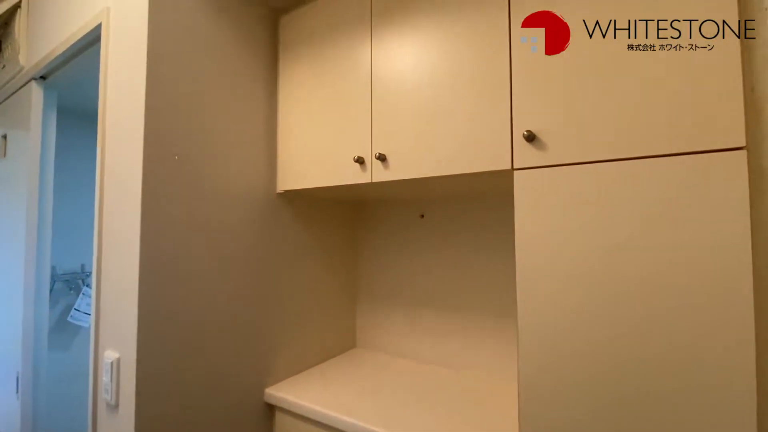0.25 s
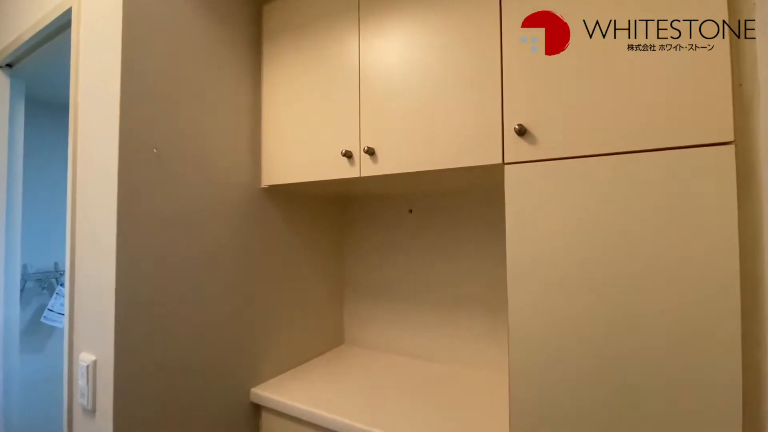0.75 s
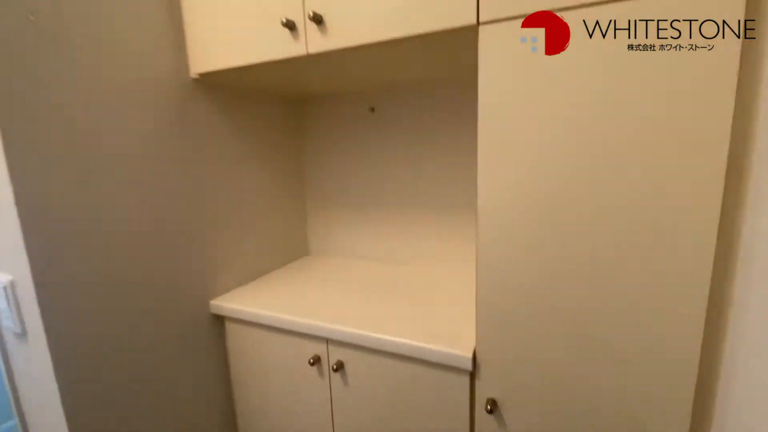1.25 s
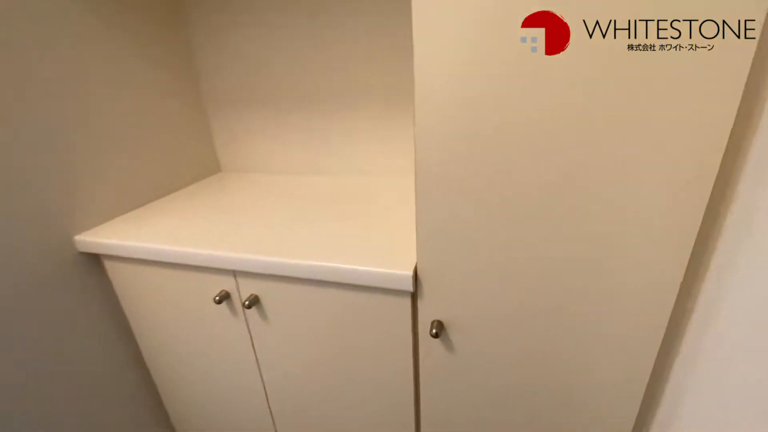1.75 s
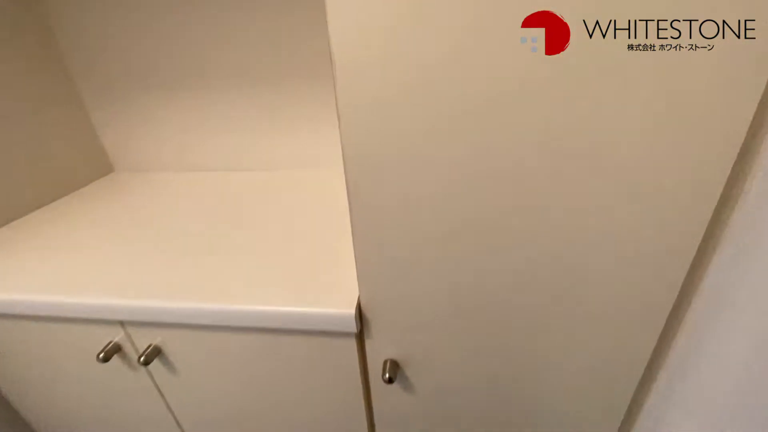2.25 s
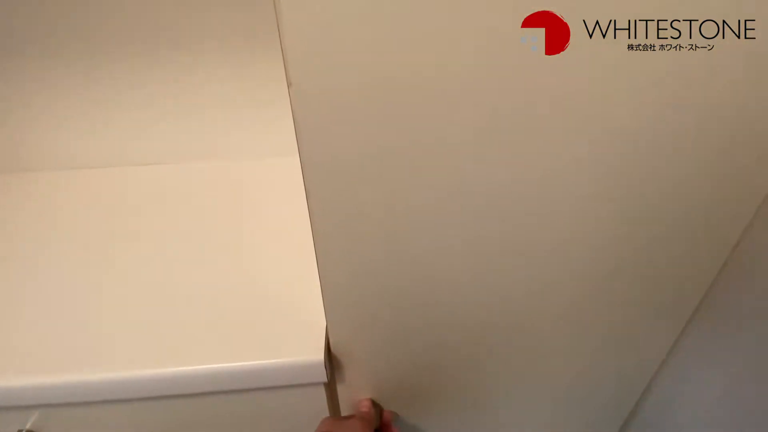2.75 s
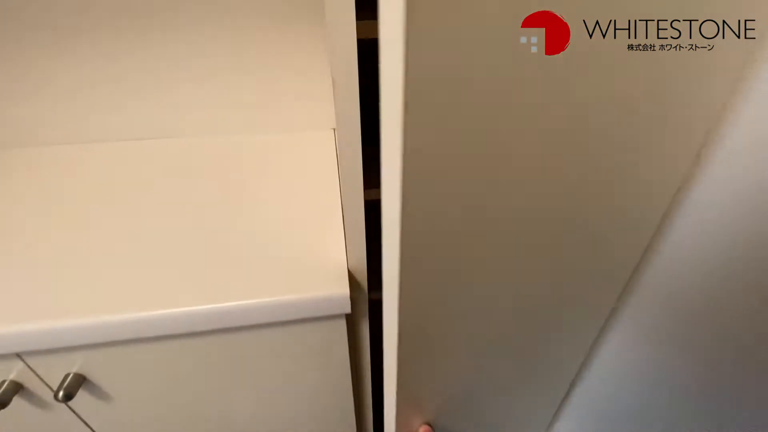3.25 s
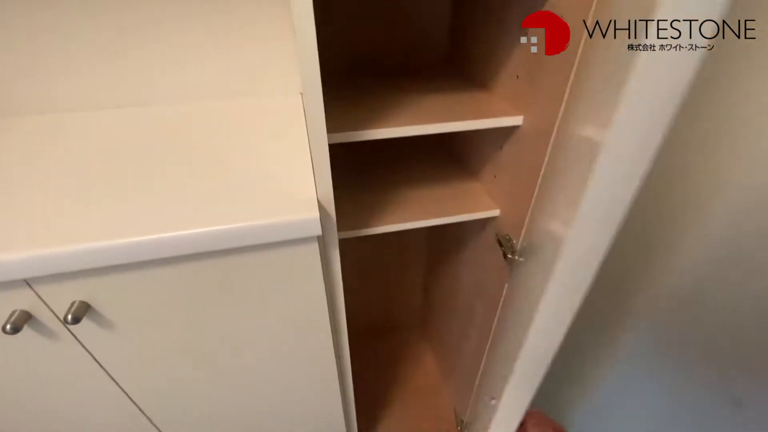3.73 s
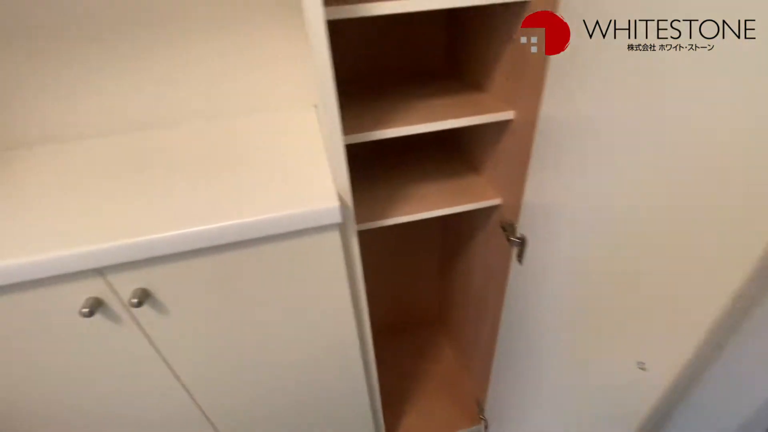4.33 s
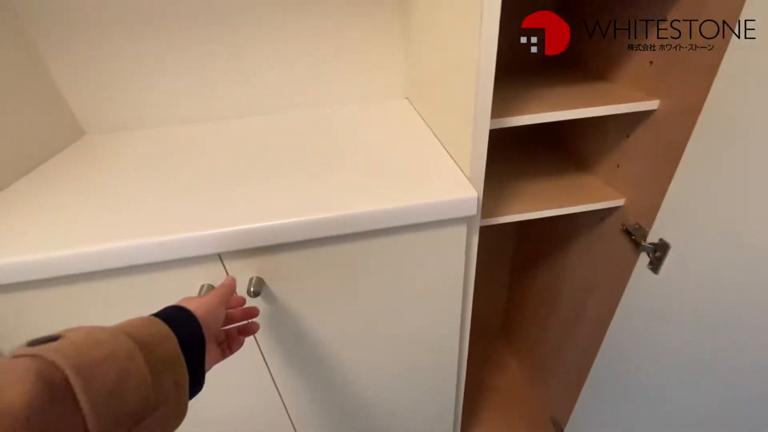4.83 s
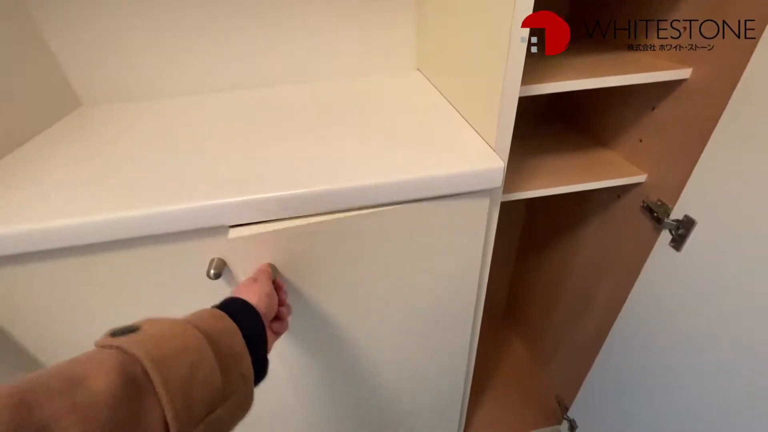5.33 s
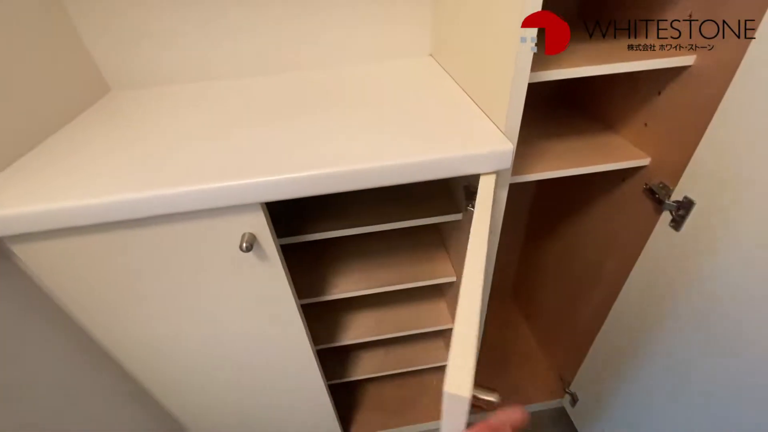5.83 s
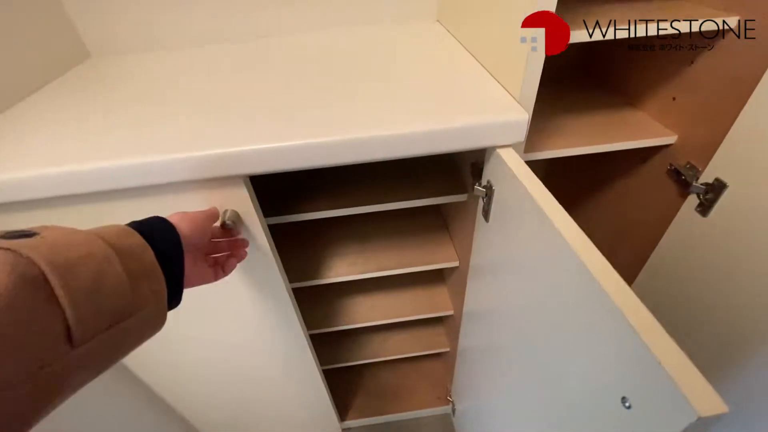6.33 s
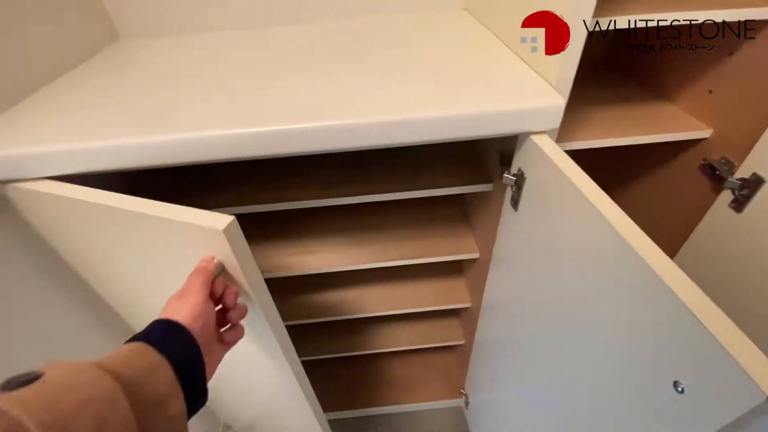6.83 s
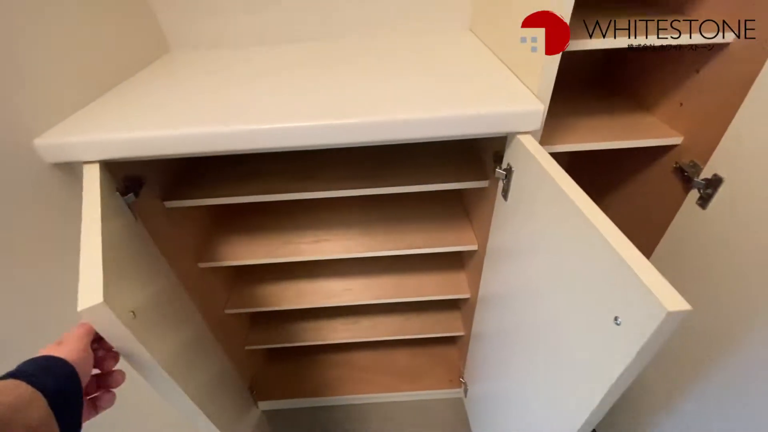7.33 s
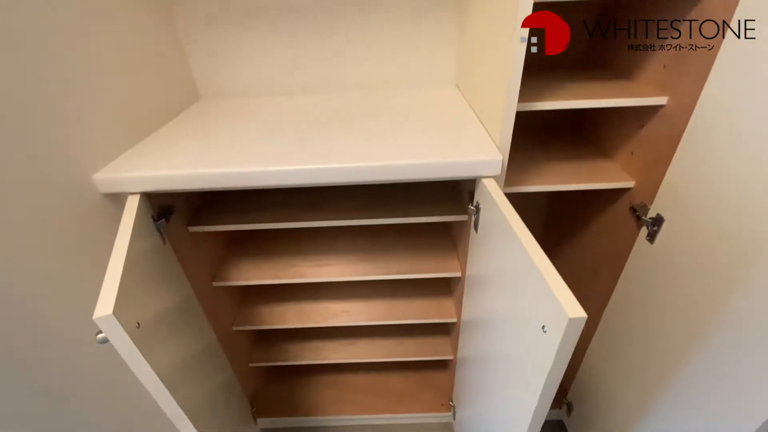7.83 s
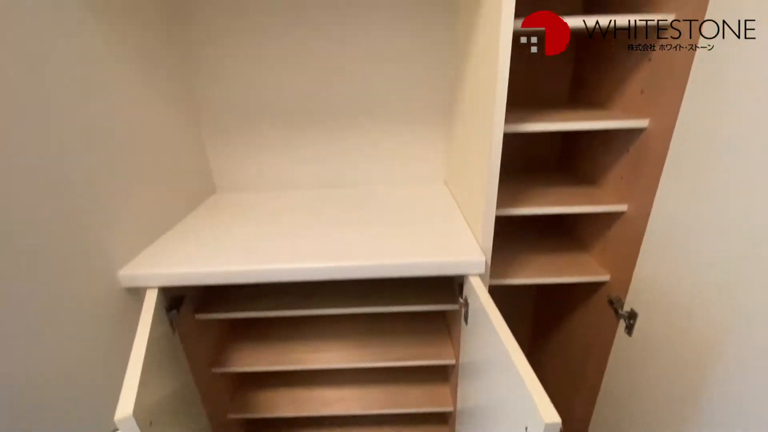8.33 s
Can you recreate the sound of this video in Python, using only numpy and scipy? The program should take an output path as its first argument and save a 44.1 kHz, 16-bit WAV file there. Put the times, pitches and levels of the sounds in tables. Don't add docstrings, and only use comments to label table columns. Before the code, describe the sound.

Close stereo sound of cupboard doors being handled in a hard-walled room. First a medium double clack, then quiet sleeve movement and soft floor shifts. Low knocks, short creaks and metallic hinge clicks lead to the loudest event, a deep wooden slam rattling for about half a second. Later come brief drags, one muffled bang and tiny taps over faint room rumble and soft hiss.

```python
import sys
import numpy as np
from scipy import signal
from scipy.fft import rfft, irfft, next_fast_len
from scipy.io import wavfile
from scipy.ndimage import uniform_filter1d

SR = 44100
rng = np.random.default_rng(int(sys.argv[2]) if len(sys.argv) > 2 else 0)


def persist_wave(psi):
    counts = np.round(np.clip(psi, -1, 1) * 32767).astype(np.int16)
    wavfile.write(sys.argv[1], SR, np.atleast_2d(counts).T)


def volts_from_db(level):
    exponent = np.asarray(level, float) / 20
    return 10 ** exponent


N = 378378

# hz, level_db
HUM = [(12, -67), (20, -16), (53, 3), (78, 2.5), (97, -12), (180, -13.5), (230, -18), (400, -120)]
HUM_DB = -53.5
# start_s, length_s, level_db
STEPS = [
    (0.727, 0.49, -54.5),
    (1.65, 0.73, -66),
    (5.843, 0.18, -75),
    (7.746, 0.22, -69),
]
STEP_ATTACK_S, STEP_DYING_DB_S = 0.11, 84
# time_s, level_db
TRAFFIC = [(0, -58.5), (.9, -58), (1.3, -61), (2.1, -58.5), (3.2, -59), (4, -59), (4.5, -63), (5.4, -62),
           (6.0, -64), (6.7, -62), (7.1, -62.5), (7.8, -60), (8.3, -61), (8.58, -62)]
TRAFFIC_BOOM_DB = -58
# hz, level_db
AIR = [(240, -13), (400, 2), (673, -2), (1020, -1.5), (1230, -5), (3020, -21.5), (5200, -31), (8800, -120)]
# hz, level_db
HISS = [(1180, -38), (2000, 0), (5540, -16), (7310, -8), (11900, -52), (13000, -23), (14400, -16),
        (16000, -12)]
HISS_DB = -75.5
# start_s, length_s, level_db, crispness_db
RUBS = [(0, 0.48, -80, 1.5), (0.994, 0.13, -70, -1), (1.22, 0.15, -77.5, 3), (1.603, 0.068, -69.5, 10),
        (1.727, 0.46, -74, -3), (1.838, 0.11, -76, 7.5), (1.985, 0.063, -65, -1.5),
        (2.183, 0.25, -58, -7.5), (2.317, 0.14, -64, -27), (2.432, 0.38, -62, -1), (2.842, 0.51, -63.5, -3),
        (3.36, 0.1, -73.5, -2), (3.481, 0.76, -62.5, -2), (3.8, 0.32, -66.5, -2), (4.238, 0.85, -67, -2),
        (4.34, 0.019, -67, 11), (4.917, 0.8, -69, -1), (5.734, 0.42, -76, 1.5), (6.15, 0.79, -72.5, -1.5),
        (6.913, 0.16, -79.5, 5), (7.117, 0.46, -70.5, -5), (7.57, 0.64, -67, -4.5), (7.73, 0.024, -69, 14),
        (8.017, 0.076, -68.5, -3), (8.22, 0.47, -73, -4.5)]
RUB_ATTACK_S, RUB_DYING_DB_S, RUB_BODY_DB = 0.061, 215, 3.5
# hz, level_db
CLOTH = [(1060, 4.5), (1800, 3.5), (4590, -1.5), (5680, -4.5), (7330, 1), (8000, -14), (10400, -54),
         (17600, -120)]
# hz, level_db
CRISP = [(4710, -6.5), (8000, -6), (11900, -13.5), (12500, -13), (13200, -36), (14400, -12.5), (15100, -17),
         (16000, -12)]
# hz, level_against_sum_db
SIDE_FAR = [(60, -11), (200, -6), (380, -2.5), (700, 3), (1290, 2), (2380, 0.5), (8120, -1.5), (15000, 0.5)]
# hz, level_against_sum_db
SIDE_NEAR = [(60, -9), (200, -10), (380, -2.5), (700, 2), (1290, -1), (2380, 0), (4400, -2), (15000, -2.5)]
# hz, t60_s
ROOM_T60 = [(60, 0.95), (300, 0.31), (1500, 0.24), (5000, 0.19), (14000, 0.12)]
ROOM_BANDS_HZ = 25 * 2 ** np.arange(0, 9.6, .5)
# hz, level_db
SCATTER_BASS = [(40, -14), (400, 0)]
SCATTER_T60_S = 0.14
# hz, level_db
TREBLE_SHAPE = [(12300, 0), (12750, -24), (13550, -24), (13800, 0), (15200, -1), (15900, -16), (16500, -40)]
# start_s, peak_db, pitch_hz, length_s
CREAKS = [(2.975, -46, 694, 0.014), (3.037, -44, 716, 0.0093), (3.053, -46, 745, 0.036),
          (3.105, -42.5, 680, 0.0099), (3.169, -40, 700, 0.006), (3.188, -41, 700, 0.009),
          (3.264, -38, 715, 0.01), (3.323, -36.5, 694, 0.012), (3.617, -46, 1450, 0.028),
          (3.617, -44.5, 727, 0.008), (5.708, -56, 1450, 0.022)]
SQUEAK_FALL_PER_S, SQUEAK_FALL_MAX = 16.3, 0.257
SLIP_JITTER = (.5, 1.6)
# start_s, peak_db, pitch_hz, t60_s
KNOCKS = [
    (1.554, -49.5, 1000, 0.053),
    (2.739, -32, 413, 0.036),
    (2.747, -30, 480, 0.022),
    (2.756, -28, 356, 0.028),
    (2.765, -29, 345, 0.027),
    (2.788, -36, 305, 0.046),
    (2.968, -43, 523, 0.069),
]
# start_s, peak_db,
# pitch_hz, t60_s
DRUMS = [(.395, -28, 196, .12), (0.459, -29.5, 148, 0.14), (.52, -42, 160, 0.12), (0.607, -33, 133, 0.17),
         (4.573, -13, 132.7, 0.22), (4.606, -13.5, 133, 0.15), (4.671, -26, 146, 0.1),
         (4.718, -24, 146, .2), (4.845, -23, 131, 0.44), (4.867, -20.5, 129, 0.19), (4.958, -13, 136, 0.09),
         (4.553, -29, 2550, .07), (4.552, -28, 2000, .08), (2.875, -45, 270, .2), (4.835, -32.5, 2075, .12),
         (4.814, -37, 2180, 0.073), (.433, -34, 780, 0.22), (.392, -29, 440, .15), (.387, -39, 2250, .08),
         (.51, -45, 2300, 0.052), (0.56, -44, 1860, .06), (.515, -36, 420, .12), (6.553, -55, 1480, .1),
         (6.555, -59, 1700, .08), (6.345, -42, 1090, .06), (2.745, -40, 620, .07),
         (2.763, -40.5, 592, 0.092), (2.6, -37, 197, 0.091), (6.278, -37.5, 124, .15),
         (6.337, -21, 135, .15), (6.381, -22, 111.4, 0.28), (6.549, -34, 235.3, 0.43),
         (6.601, -27.5, 116.4, 0.19), (6.853, -35, 127, 0.11), (6.895, -39, 122, 0.16),
         (6.913, -32.5, 119.3, 0.23), (7.179, -47, 115, 0.12), (2.755, -42, 225, 0.14),
         (2.965, -44, 1650, .025), (3.17, -42, 110, .15), (3.323, -46, 260, .1), (3.01, -40, 100, .1),
         (.617, -48, 1740, .1), (.575, -46, 1150, .05), (.39, -40, 1280, .1), (3.68, -45, 98, 0.22),
         (3.781, -47, 178, .1), (3.3, -41.5, 100, 0.23), (3.359, -40, 255, 0.12), (3.065, -43, 330, .08),
         (3.111, -46, 295, .08), (5.78, -60, 546, 0.69), (0.387, -38, 1733, 0.18),
         (0.399, -44, 2800, 0.087)]
# start_s, peak_db, pitch_hz
SNAPS = [
    (3.038, -39, 710),
    (3.097, -29.5, 1010),
    (3.36, -35.5, 534),
    (3.795, -34.5, 776),
    (3.616, -47, 1700),
    (4.14, -35, 1400),
    (8.149, -44.5, 2100),
]
# start_s, peak_db, pitch_hz
TICKS = [(2.738, -51, 4800), (2.739, -53, 5600), (2.744, -52, 3750), (2.747, -55, 3900),
         (3.147, -47.5, 11450), (3.3676, -47, 11350), (4.1403, -52, 10600), (4.1405, -48, 13900),
         (4.164, -55, 11700), (6.663, -61, 5330), (7.1234, -62, 4000), (8.548, -56.5, 6950),
         (5.191, -55.5, 5790)]
# start_s, length_s, level_db, panel_note_db
DRAGS = [
    (2.733, 0.08, -44, -2),
    (2.962, 0.14, -39, -12),
    (3.152, 0.048, -45, -10),
    (3.63, 0.07, -46, -14),
    (5.246, 0.11, -46, 0.5),
    (5.366, 0.092, -42, -13),
    (7.126, 0.05, -44, -14),
]
DRAG_ATTACK_S, DRAG_DYING_DB_S = 0.026, 250
# start_s, peak_db, crack_db
BANGS = [(0.386, -18, -32), (0.508, -31, -37), (4.55, -1, -52), (4.562, -25, -26), (4.579, -24, -38),
         (4.6, -30, -25), (4.622, -35, -29.5), (4.643, -36, -30.5), (4.681, -13, -32.5), (4.786, -17, -46),
         (4.809, -10, -30.5), (4.835, -15, -47), (4.902, -19, -53), (4.95, -34, -39.5), (6.275, -52, -73),
         (6.298, -52, -43.5), (6.32, -16, -33.5), (6.331, -21, -52), (6.55, -30, -69), (6.833, -43, -63),
         (6.882, -42, -57.5)]
# start_s, length_s, level_db, brightness_db, sag_db_per_s
SHAKES = [
    [(0.384, 0.1, -26.5, -12.5, 60), (0.509, 0.26, -30, -14.5, 57.5)],
    [(4.542, 0.19, -12.5, -18, 40), (4.77, 0.018, -27, -24, 10), (4.785, 0.099, -25, -14.5, 35),
     (4.9, 0.054, -25, -19.5, 24)],
    [(6.262, 0.068, -56, -2.5, -55), (6.318, 0.22, -23.5, -22.5, 79), (6.548, 0.047, -39, -34, 45)],
    [(6.828, 0.028, -40, -24, 10), (6.88, 0.088, -40.5, -44, 15)],
]
# level_db, brightness_share, sag_share, dying_db_per_s, attack_s
BOOM = (0.07, 0.013, 1.04, 139, .012)
CLACK = (.1, .6, 1.38, 300, .005)
SIZZLE = (.1, 1.007, 1.92, 470, 0.0026)
# hz, width_hz, level_db
PANELS = [
    [(51.3, 16, -3), (164, 27, 2), (428, 60, -9)],
    [(47.2, 3.6, 3.5), (130.8, 26, 3), (175.8, 6.5, -0.5), (214, 6.7, 0), (266, 10.4, 1), (310, 22.6, -3.5)],
    [(82, 29, -14), (117.6, 12.7, 0), (139, 33, -4.5), (196, 29, -1.5), (226, 18.5, -4)],
    [(108, 17.6, -0.5), (230, 51, -10)],
]
# hz, level_db
WOOD = [
    [(18, -38), (30, -3), (59, 2), (102, -18), (146, 3.5), (400, -15.5), (520, -59), (880, -120)],
    [(18, -37), (30, -28), (124, 1), (198, -5.5), (262, -4), (400, -14), (520, -84), (880, -120)],
    [(18, -47), (30, -15), (108, 22), (166, 3), (233, -3), (400, -17), (520, -53), (880, -120)],
    [(18, -46), (30, -8), (118, 0), (235, -22), (280, -35), (400, -30), (520, -53), (880, -120)],
]
# hz, width_hz, level_db
FITTINGS = [
    [(480, 89, 2.5), (561, 12, 14.5), (800, 70, 1.5), (1760, 180, -8.5), (2270, 110, -6.5),
     (3190, 260, -12), (3610, 200, -18), (4500, 200, -22), (5140, 210, -38)],
    [(483, 22, -6), (520, 19, -3.5), (562, 21, -2.5), (745, 95, -15), (1070, 28, -5.5), (1298, 33, -8),
     (1910, 30, -24), (2160, 310, -22), (2590, 46, -18), (3910, 100, -21.5)],
    [(345, 58, 4), (450, 73, 2.5), (1110, 35, -35), (1700, 87, -14), (2830, 78, -19)],
    [(470, 94, -8), (1000, 50, -5), (1930, 200, -29)],
]
# hz, level_db
EDGE = [(210, 8), (350, 9), (418, -1), (871, -2), (1050, -5.5), (1260, -3), (1800, -32), (2340, -85)]
# hz, level_db
CRACK = [
    [(940, -12), (1600, 3), (2670, -11), (3020, -4), (4750, 2), (5760, -6), (6850, -6), (16000, -45)],
    [(940, -0.5), (1600, 0), (3390, -10.5), (6990, -7), (9510, -20), (11200, -14.5), (13900, -32),
     (16000, -55)],
    [(940, -6.5), (1600, -3.5), (4190, -4.5), (5870, -12), (7050, -8.5), (13200, -24), (16000, -21)],
    [(940, -31), (1600, 6), (6470, -7), (11900, -37), (12900, -37), (16000, -24)],
]
# hz, width_hz, level_db
STEEL = [
    [(3060, 60, -1), (3900, 53, -3), (4450, 59, -3), (4680, 54, -5), (5200, 64, -7), (7050, 70, -4)],
    [(1554, 60, -2), (1880, 40, -2), (2190, 47, -4), (3220, 40, 5), (3880, 49, -2), (4470, 40, 3.5),
     (4830, 39, -3), (6930, 40, 1), (7080, 60, 0)],
    [(1220, 60, 1), (1610, 60, -2), (2510, 50, -5)],
    [(1000, 60, 3)],
]
# start_s, peak_db, pitch_hz
RAPS = [(.388, -21, 500), (0.397, -30, 368), (.421, -31, 720), (.450, -20, 774), (.449, -28, 308),
        (.466, -27, 750), (.512, -39, 685), (0.521, -34, 350), (.535, -34, 720), (.547, -33, 657),
        (.571, -29, 720), (.614, -36, 295), (.635, -32, 620), (4.553, -12, 603), (4.548, -23, 310),
        (4.562, -22, 730), (4.582, -23, 700), (4.559, -4.5, 289), (4.576, -14, 296), (4.578, -23, 1070),
        (4.591, -12, 266), (4.617, -10.5, 278), (4.621, -28, 726), (4.64, -19, 272), (4.678, -16, 226),
        (4.691, -19.5, 255), (4.699, -27, 1080), (4.723, -19, 241), (4.752, -31, 276), (4.786, -26, 540),
        (4.593, -22, 1290), (4.958, -32, 1240), (4.643, -30, 1800), (4.777, -32, 1306), (4.803, -25, 302),
        (4.809, -34, 1085), (4.828, -28, 1080), (4.831, -24, 266), (4.85, -16, 301), (4.909, -24, 322),
        (4.929, -28, 726), (4.962, -25, 271), (6.321, -22.5, 385), (6.336, -36, 270), (6.369, -22.5, 292),
        (6.38, -33, 630), (6.402, -27, 266), (6.445, -45, 266), (6.552, -34.5, 417), (6.832, -41, 396),
        (6.866, -43, 244), (7.14, -43, 252), (7.17, -48, 252)]
RAP_CYCLES = 16.0
# start_s, peak_db
CLICKS = [(0.3849, -30.5), (0.5093, -42), (0.604, -57), (4.5525, -25.5), (4.575, -23), (4.62, -21.5),
          (4.642, -28), (4.7, -42), (4.712, -38), (4.7867, -48), (4.8094, -32), (4.835, -35), (4.9015, -49),
          (4.95, -47), (6.299, -50), (6.325, -46), (4.928, -49)]
CLICK_T60_S = 0.0086
# hz, level_db
CLICK = [(700, -24), (1500, 4), (5000, -8.5), (9500, 0.5), (12000, -3), (16000, -9)]


def rms_one(x):
    return x / np.sqrt(np.mean(x ** 2) + 1e-20)


def at_hz(points, hz):
    f, value = np.transpose(points)
    return np.interp(np.log(np.maximum(hz, 1)), np.log(np.maximum(f, 1)), value)


def gains(points, size):
    return volts_from_db(at_hz(points, np.fft.rfftfreq(size, 1 / SR)))


def colour(x, points):
    size = next_fast_len(x.shape[-1])
    return irfft(rfft(x, size) * gains(points, size), size)[..., :x.shape[-1]]


def drift(rate):
    r = np.exp(-80 * np.pi * rate / SR)
    luck = rng.standard_normal(N // 40 + 2002)
    slow = signal.lfilter([1], [1, -2 * r, r * r], luck)[2000:]
    return np.interp(np.arange(N) / 40, np.arange(len(slow)), rms_one(slow))


def grains(per_s, spread_db):
    rank = np.minimum(rng.exponential(1, N), 3.0)
    sizes = volts_from_db(spread_db * rank) * rng.choice([-1, 1], N)
    return rms_one(sizes * (rng.random(N) < per_s / SR))


def resonate(x, hz, width_hz):
    r = np.exp(-np.pi * width_hz / SR)
    top = np.array([1, 0, -1]) * (1 - r * r) / 2
    return signal.lfilter(top, [1, -2 * r * np.cos(2 * np.pi * hz / SR), r * r], x)


def ringing(x, modes):
    steps = np.arange(len(x)) / (0.0313 * SR)
    out = 0
    for k, (hz, width_hz, db) in enumerate(modes):
        luck = rng.standard_normal(int(len(x) / 500))
        wander_db = 1.0 * np.interp(steps, np.arange(len(luck)), luck)
        out = out + resonate(x * volts_from_db(db + wander_db), hz, width_hz) * (-1) ** k
    return out


def add(track, s, sound):
    at = round(s * SR)
    track[at:at + len(sound)] += sound[:N - at]


def ping(hz, t60, db):
    t = np.arange(SR // 4) / SR
    decay = volts_from_db(db - 60 * t / max(t60, .002))
    return decay * np.sin(2 * np.pi * hz * t) * np.minimum(1.52 * hz * t, 1)


def stroke(s, length, db, attack, sag_db, dying_db):
    out, t = np.zeros(N), np.arange(round((length + 1) * SR)) / SR
    held = np.minimum(t, length)
    add(out, max(s, 0), np.minimum(t / attack, 1) * volts_from_db(db - sag_db * held - dying_db * (t - held)))
    return out


def far_noise(spectrum, level_db, patchy_db, rate):
    size = next_fast_len(N)
    real, imaginary = rng.standard_normal((2, 2, size // 2 + 1))
    shape = gains(spectrum, size) * (real + 1j * imaginary)
    shape[1] *= gains(SIDE_FAR, size)
    mid, side = irfft(shape, size)[:, :N]
    scale = volts_from_db(level_db + patchy_db * drift(rate)) / np.std(mid)
    return np.array([mid + side, mid - side]) * scale


def hum_and_steps():
    level = volts_from_db(HUM_DB)
    for s, length, db in STEPS:
        level = level + stroke(s, length, db, STEP_ATTACK_S, 0, STEP_DYING_DB_S)
    return level * far_noise(HUM, 0, patchy_db=-0.5, rate=8.5)


def traffic_boom(traffic_db):
    spectrum = [(90, 3), (140, 4.5), (280, 7.5), (450, -3.5), (700, -44.5)]   # hz, level_db
    level_db = TRAFFIC_BOOM_DB + traffic_db - traffic_db.mean()
    return far_noise(spectrum, level_db, patchy_db=1.2, rate=9.4)


def air_and_sleeve(traffic_db):
    rustle = fizz = 0
    for s, length, db, crisp_db in RUBS:
        rub = stroke(s - RUB_ATTACK_S / 2, length, db, RUB_ATTACK_S, 0, RUB_DYING_DB_S)
        rustle, fizz = rustle + rub, fizz + rub * volts_from_db(crisp_db)
    rub_body = volts_from_db(RUB_BODY_DB) * (rustle - fizz).clip(0)
    air = np.hypot(volts_from_db(traffic_db), rub_body) * far_noise(AIR, 0, patchy_db=1.38, rate=11.6)
    cloth = rustle * far_noise(CLOTH, 0, patchy_db=2.0, rate=88.0)
    crisp = fizz * far_noise(CRISP, 0, patchy_db=-1.0, rate=130.0)
    return air + cloth + crisp


def background():
    traffic_db = np.interp(np.arange(N) / SR, *np.transpose(TRAFFIC))
    hiss = far_noise(HISS, HISS_DB - 4.5, patchy_db=3.5, rate=2.5)
    return hum_and_steps() + traffic_boom(traffic_db) + air_and_sleeve(traffic_db) + hiss


def room(x):
    t, tail = np.arange(SR // 2) / SR, 0
    white = rng.standard_normal((2, SR // 2))
    for low, high in zip(ROOM_BANDS_HZ, ROOM_BANDS_HZ[1:]):
        band = signal.sosfilt(signal.butter(2, [low, high], "band", fs=SR, output="sos"), white)
        decay = volts_from_db(-60 * t / at_hz(ROOM_T60, low)) * np.minimum(t / 0.0019, 1)
        tail = tail + band * decay * min(low / 350, 1)
    tail = tail / np.sqrt(np.sum(tail[0] ** 2))
    side = volts_from_db(2.5) * colour(tail[1], SIDE_NEAR)
    return signal.oaconvolve(x[None], np.array([tail[0] + side, tail[0] - side]), axes=1)[:, :N]


def ports(x, side_db, scatter_db):
    size = next_fast_len(N)
    t = np.arange(SR // 10) / SR
    scatter = rng.standard_normal(len(t)) * volts_from_db(-60 * t / SCATTER_T60_S)
    scatter = scatter / np.sqrt(np.sum(scatter ** 2))
    scattered = volts_from_db(scatter_db) * rfft(scatter, size) * gains(SCATTER_BASS, size)
    mixed = volts_from_db(side_db) * 1j + scattered
    side = irfft(mixed * rfft(x, size) * gains(SIDE_NEAR, size), size)[:N]
    return np.array([x + side, x - side])


def creaks():
    out = np.zeros(N)
    t = np.arange(3000) / SR
    for s, db, hz, length in CREAKS:
        squeak = hz > 1000
        luck = rng.standard_normal(len(t))
        grip = np.minimum(t / 0.0014, 1) * np.clip((length + 0.006 - t) / 0.008, 0, 1)
        grip = grip * (1 + 0.21 * np.sqrt(40) * uniform_filter1d(luck[::-1], size=40))
        fall = squeak * np.minimum(SQUEAK_FALL_PER_S * t, SQUEAK_FALL_MAX)
        jitter = SLIP_JITTER[int(squeak)] * uniform_filter1d(luck, size=150)
        phase = 2 * np.pi * np.cumsum(hz * (1 - fall + jitter)) / SR
        overtone = 0.4 * (hz < 1000) * np.sin(1.72 * phase)
        add(out, s, volts_from_db(db - 2.5) * grip * (np.sin(phase) + overtone))
    return out


def knocks_and_ticks():
    out = np.zeros(N)
    for s, db, hz, t60 in KNOCKS:
        add(out, s, ping(hz, t60, db - 0.5) + ping(1.606 * hz, 1.2 * t60, db - 8.0))
        add(out, s, ping(3.3 * hz, 0.41 * t60, db - 35) + ping(0.55 * hz, 1.6 * t60, db - 6.0))
    for s, db, hz, t60 in DRUMS:
        add(out, s, ping(hz, t60, db))
    for s, db, hz in SNAPS:
        add(out, s, ping(hz, 12.5 / hz, db + 1.0) + ping(1.42 * hz, 4.8 / hz, db - 2.0))
        add(out, s, ping(0.77 * hz, 5.3 / hz, db + 8.5))
    for s, db, hz in TICKS:
        add(out, s, ping(hz, 0.013, db) + ping(1.09 * hz, 0.0034, db + 0.5) + ping(0.96 * hz, 0.0063, db))
    return out


def dragging_edges():
    out, lumps = 0, grains(250, spread_db=3.0)
    low = rms_one(resonate(resonate(lumps, 55, 74), 55, 104))
    panel = rms_one(resonate(resonate(lumps, 219.5, 8.9), 237, 39))
    for s, length, db, panel_db in DRAGS:
        drag = stroke(s, length, db, DRAG_ATTACK_S, 0, DRAG_DYING_DB_S)
        out = out + drag * (low + volts_from_db(panel_db) * panel)
    return out


def shaking(rows, layer):
    layer_db, bright_share, sag_share, dying_db, attack = layer
    out = 0
    for s, length, db, bright_db, sag_db in rows:
        level_db = db + layer_db + bright_share * bright_db
        out = out + stroke(s, length, level_db, attack, sag_share * sag_db, dying_db)
    return out


def edges(x, fittings):
    return ringing(x, fittings) + volts_from_db(-11.0) * colour(x, EDGE)


def banging_panels():
    thud, snap, click, out = np.zeros((4, N))
    t = np.arange(SR // 10) / SR
    for s, peak_db, crack_db in BANGS:
        add(thud, s, volts_from_db(peak_db - 9.0 - 60 * t / 0.074) * np.minimum(t / 0.0098, 1))
        add(snap, s, volts_from_db(crack_db - 2.0 - 60 * t / 0.066) * np.minimum(t / 0.0018, 1))
    for s, db in CLICKS:
        add(click, s, volts_from_db(db - 60 * t / CLICK_T60_S))
    for s, db, hz in RAPS:
        add(out, s, ping(hz, RAP_CYCLES / hz, db))
    low_hits, mid_hits = grains(400, spread_db=2.5), grains(1500, spread_db=2.0)
    high_hits = grains(6000, spread_db=2.6)
    for rows, modes, fittings, wood, crack, steel in zip(SHAKES, PANELS, FITTINGS, WOOD, CRACK, STEEL):
        part = slice(round(rows[0][0] * SR) - SR // 10, round(rows[-1][0] * SR) + SR // 2)
        low, mid, high = low_hits[part], mid_hits[part], high_hits[part]
        boom, clack, sizzle = (shaking(rows, layer)[part] for layer in (BOOM, CLACK, SIZZLE))
        push = boom + thud[part]
        swell = uniform_filter1d(push, size=601, origin=300)
        out[part] += volts_from_db(-5.5) * ringing(low * push, modes) / np.std(ringing(low, modes))
        out[part] += volts_from_db(-8.5) * rms_one(colour(low, wood)) * swell
        driven = mid * (clack + volts_from_db(-0.5) * thud[part])
        out[part] += volts_from_db(1.0) * edges(driven, fittings) / np.std(edges(mid, fittings))
        bright = rms_one(colour(high, crack)) * (sizzle + snap[part])
        out[part] += volts_from_db(-1.0) * bright
        for hz, width_hz, db in steel:
            out[part] += volts_from_db(db) * resonate(bright, hz, width_hz)
        out[part] += rms_one(colour(high, CLICK)) * click[part]
    return out


def scene():
    wood = banging_panels() + dragging_edges()
    metal = creaks() + knocks_and_ticks()
    far = room(volts_from_db(-6.5) * wood + volts_from_db(-7.0) * metal) + background()
    near = ports(volts_from_db(-1.5) * wood + metal, side_db=-6.0, scatter_db=-0.5)
    return far + near * volts_from_db(np.array([[-.8], [.8]]))


def top_cut(x):
    return signal.sosfilt(signal.butter(12, 16460, fs=SR, output="sos"), x)


def record(dry):
    rounded = 0.89 * np.tanh(dry / 0.86)
    return top_cut(colour(rounded, TREBLE_SHAPE))


dry = scene()
out = record(dry)
persist_wave(out)
```